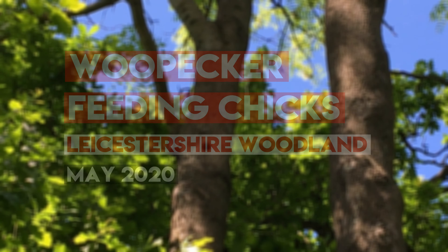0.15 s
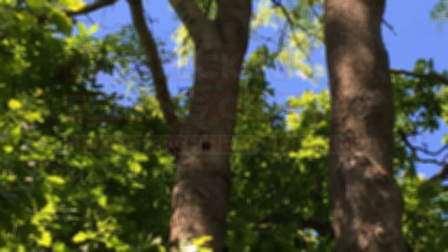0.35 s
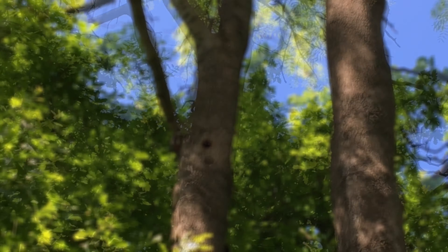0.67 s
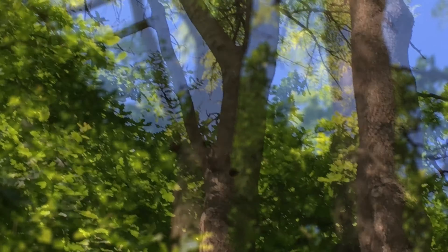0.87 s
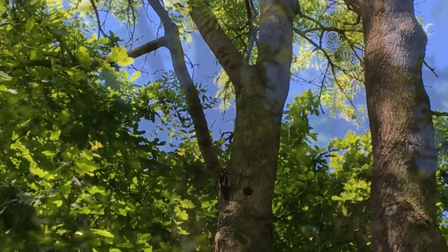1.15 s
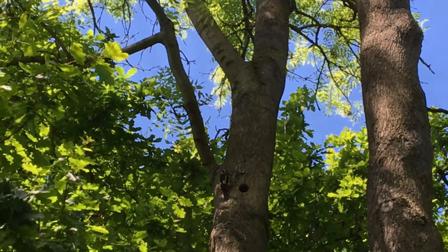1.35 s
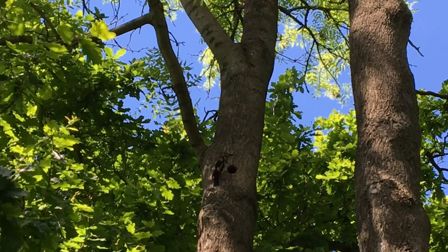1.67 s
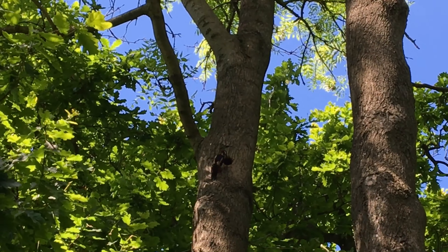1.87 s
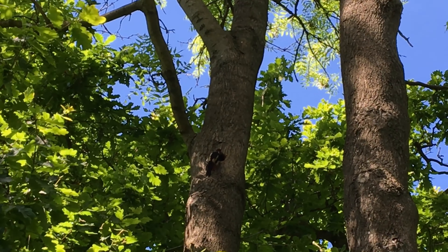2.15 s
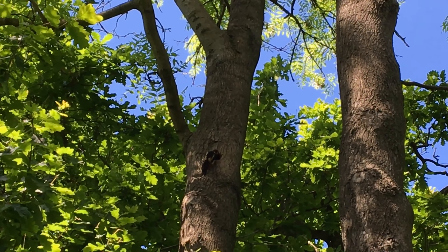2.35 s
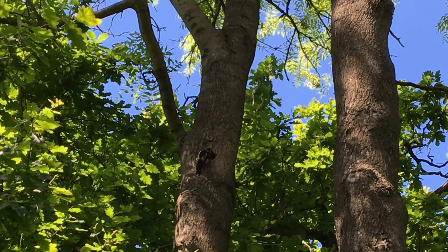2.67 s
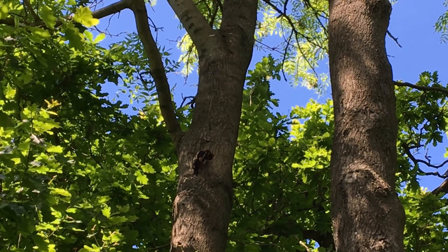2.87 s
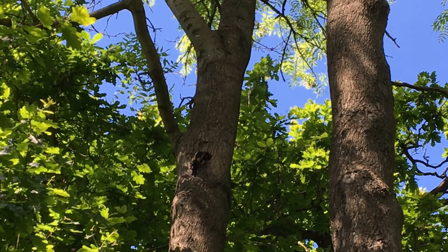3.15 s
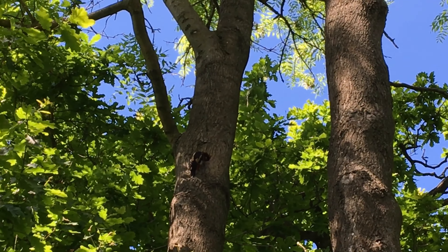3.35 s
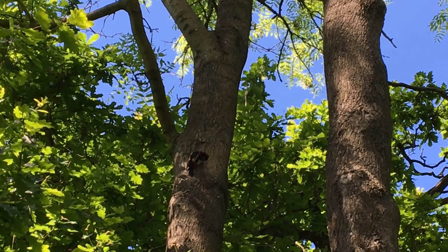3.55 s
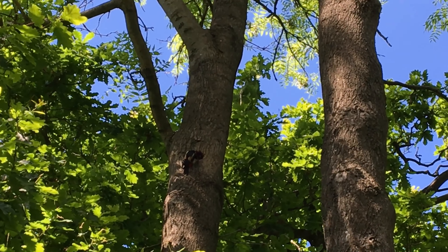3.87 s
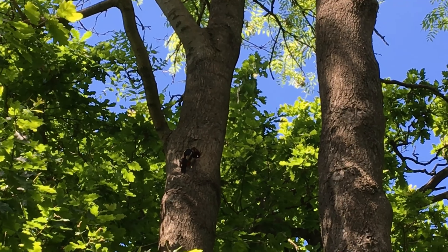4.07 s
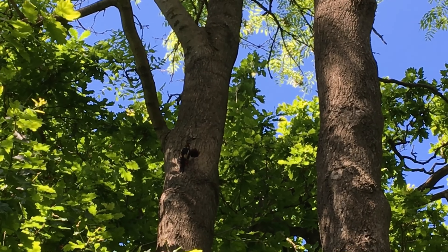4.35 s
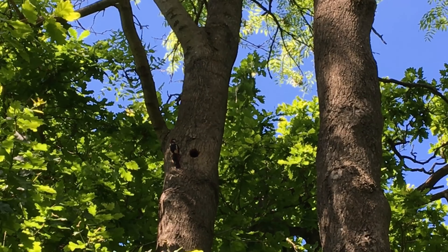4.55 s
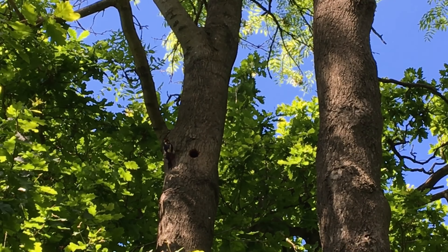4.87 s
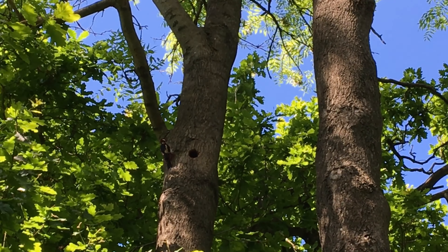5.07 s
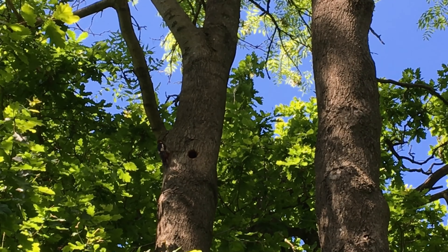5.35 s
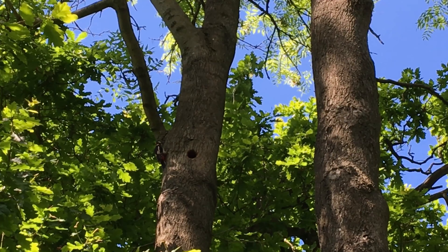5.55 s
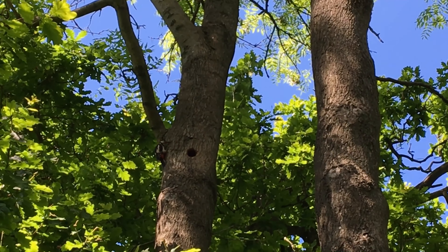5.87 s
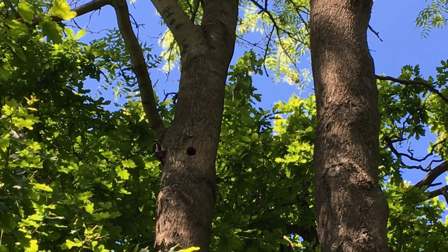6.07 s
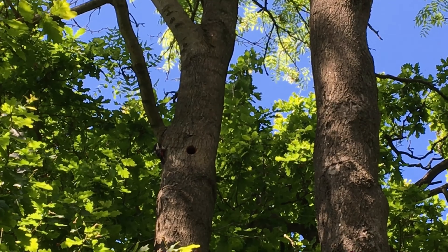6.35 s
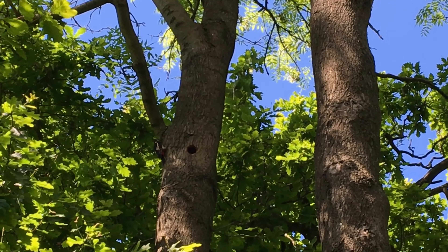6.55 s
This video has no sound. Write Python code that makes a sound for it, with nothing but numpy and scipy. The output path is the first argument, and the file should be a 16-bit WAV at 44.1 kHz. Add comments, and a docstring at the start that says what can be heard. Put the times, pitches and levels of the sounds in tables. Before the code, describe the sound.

In woodland, nestlings in a tree hole beg over a low, steady road rumble. From the start come tiny arched squeaks, each about a twentieth of a second, shrill and rich in overtones, with a brief diffuse echo from trunks and leaves. A very faint high trill of a far bird passes within the first 0.6 seconds. The calls strengthen after 1.2 and run regularly, about five a second, until 3.4, sometimes hoarse. Small dry ticks fall near 1.5 and 2.0. A heavy vehicle accelerates behind, its low hum rising from about 1.2 to 5.4, strongest around 3.9, while traffic roar and brighter hiss swell towards 4 to 5. Front squeaks weaken at 3.5 to 3.9; lower, lopsided yelps come around 4.1, 4.3, 5.1 and 5.3 among faint deep peeps. From 5.6 the clear squeaks resume steadily to the end as the traffic eases slightly.

```python
"""Woodpecker nestlings beg from a tree hole: short arched squeaks with many partials, plus a few lopsided yelps.
Each partial is a sine that follows the leaping pitch; fading noise echoes stand for trunks and leaves.
Behind the wood, coloured noise makes a road roar, and sines make a heavy vehicle accelerate on it.
A small bird trills faintly far off as a chopped whistle; there are two dry ticks and a faint hiss."""
import sys
import numpy as np
from scipy import signal
from scipy.fft import rfft, irfft
from scipy.io import wavfile
from scipy.ndimage import uniform_filter1d, map_coordinates

SR = 44100
rng = np.random.default_rng(int(sys.argv[2]) if len(sys.argv) > 2 else 0)


def generate_wav(sig):
    """Save sig (samples, or channels by samples) to the path in sys.argv[1] as 16-bit PCM at SR."""
    pcm = np.round(np.clip(np.atleast_2d(sig).T, -1, 1) * 32767).astype(np.int16)
    wavfile.write(sys.argv[1], SR, pcm)


def makeup_ratio(level_db):
    """Linear amplitude ratio for a level in decibels (20 dB per factor of ten)."""
    decades = np.asarray(level_db, float) / 20
    return 10 ** decades


N = 296352  # samples

# Chick at the mouth of the hole:
# (voice start [s], length [s], top pitch [Hz], base level [dB], muffling [dB])
FRONT_CALLS = [(-.04, 0.043, 2530, -50.5, -10.5), (.168, 0.015, 2890, -70, 17.5),
               (0.195, 0.017, 2780, -74, 22), (.347, 0.045, 2896, -61, 14), (0.563, 0.043, 2470, -53.5, 14),
               (.759, 0.039, 2570, -52, 2.5), (.96, 0.071, 2527, -53.5, 5.5),
               (.987, 0.051, 2545, -49.5, -0.3), (1.14, .051, 2570, -57, 3.5),
               (1.191, 0.042, 2744, -45.5, -3.5), (1.326, 0.049, 2584, -67.5, 9),
               (1.398, .044, 2745, -45.5, -1.5), (1.59, .043, 2960, -42.5, -9),
               (1.796, 0.048, 2795, -43, -8), (1.996, 0.044, 2814, -46.5, -6.5),
               (2.213, 0.051, 2693, -44.5, 0), (2.424, 0.05046, 2526, -43, 1), (2.629, 0.058, 2480, -44, 2),
               (2.896, .04, 2747, -44, -9), (3.092, 0.035, 2790, -41, -9.5), (3.319, .055, 2656, -44.5, 0),
               (3.553, 0.035, 5960, -78, 31.5), (3.571, 0.024, 2734, -58, 16.5),
               (3.83, 0.015, 6840, -72.5, 35), (3.843, 0.019, 3280, -57.5, 15), (3.874, .02, 2730, -61, 26),
               (4.809, .037, 2860, -58, 6), (5.575, 0.044, 2430, -47, 2.5),
               (5.76, 0.035, 2400, -46.5, -4.5), (5.956, .042, 2420, -51, 5.5),
               (6.122, 0.049, 2586, -50.5, 4), (6.311, 0.044, 2524, -49, 1), (6.498, 0.036, 2400, -48.5, 1),
               (6.682, 0.035, 2490, -49.5, 2.5)]
# Chick deep in the hole:
# (voice start [s], length [s], top pitch [Hz], base level [dB], second partial as the head turns [dB])
DEEP_CALLS = [(0.624, 0.043, 2740, -56.5, -1.5), (.812, 0.049, 2800, -51, -1.5),
              (4.378, .037, 2962, -58, -2.1), (4.456, .032, 3050, -58, -8), (4.522, 0.041, 2710, -65, 0),
              (4.662, 0.041, 2820, -62, 3), (4.864, 0.02002, 2850, -60, -9), (4.95, 0.035, 2822, -66, 2.5),
              (5.084, 0.028, 2875, -67, -6), (5.248, .028, 2850, -62, -5.5),
              (5.382, 0.037, 2730, -65.5, -1.2), (5.519, 0.053, 2750, -57, -6),
              (5.655, .038, 2570, -63.5, -19), (5.8, .036, 2575, -66, -15), (5.973, .032, 2570, -66, -9),
              (6.123, .034, 2600, -70, -8), (6.274, .036, 2600, -71, -17), (6.452, 0.023, 2382, -68, -15)]
# Lopsided yelps with a pointed crest:
# (voice start [s], rise [s], fall [s], top pitch [Hz], base level [dB])
YELP_CALLS = [(4.089, .006, .025, 2566, -46), (4.265, 0.023, 0.012, 2352, -45.5),
              (5.058, .016, .009, 1994, -48), (5.253, 0.0066, 0.019, 2270, -53.5)]
# A closing beak muffles the voice, one row for each of partials 1-5:
# (level with an even gape [dB], gain per dB of muffling [dB])
GAPE = [(0.5, 0.6169), (0, -0.04), (1, -0.51), (-7.5, -0.5), (-8.5, -0.8)]
# The front chick goes hoarse in bouts: (time [s], base breath noise [dB])
HOARSE_BOUTS = [(0, -17), (.76, -17), (1.15, -14), (1.19, -23), (2.0, -26), (2.2, -16.5), (2.65, -12.5),
                (2.88, -20.5), (3.1, -18), (3.3, -16), (3.9, -15), (5.5, -21), (6.7, -27)]
# Throat resonance that gliding partials cross: (frequency [Hz], level [dB])
THROAT = [(1500, 15), (2800, 10.5), (3800, 10.5), (5200, 6), (8000, -3.5), (13500, -10), (16000, -30.5)]
# The rim of the hole colours the front voice: (frequency [Hz], gain [dB])
RIM = [(5000, -0.7), (5900, 3), (7000, 0.1), (8500, -0.2), (9500, -0.5), (10300, -1.5), (11000, -1.5),
       (12500, 0.5), (13700, 1), (15000, -10)]
# The cavity colours the deep voice: (frequency [Hz], gain [dB])
CAVITY = [(2700, -17), (5600, 0.5), (8000, 1), (10500, -11.5), (13500, -16)]
# Colour of the yelps: (frequency [Hz], gain [dB])
YELP_COLOUR = [(2500, 1), (4600, -.1), (5200, -26), (5900, 1), (7100, -2.5), (7800, -12), (9500, 0.5),
               (10300, -18), (12500, -12)]
# Echoes of near trunks: (frequency [Hz], time to fall by 60 dB [s])
BARK = [(2000, 0.035), (8000, 0.15), (15000, 0.17)]
# Echoes of far leaves: (frequency [Hz], time to fall by 60 dB [s])
LEAVES = [(2000, 0.16), (6000, 0.6), (10000, 0.42), (15000, 0.2)]
# Road, before each noise gets its own trim; the bright hiss fades in during the first 1.5 s:
# (time [s], traffic flow level [dB], bright hiss level [dB])
TRAFFIC = [(0, -47.5, -89), (.82, -49.5, -77), (1.12, -49, -65), (1.5, -45, -60.5), (2.04, -45, -58),
           (2.5, -44.5, -59), (2.77, -45, -57), (3.12, -44.5, -56), (3.6, -44, -55), (3.99, -42.5, -54),
           (4.9, -42.5, -50.5), (5.1, -42.5, -53.5), (5.5, -44, -54.5), (5.84, -43.5, -57.5),
           (6.12, -45, -60), (6.53, -44.5, -59.5), (6.72, -46, -63)]
# Shapes of the road noises, whose loudness is set later: (frequency [Hz], relative level per Hz [dB])
RUMBLE = [(18, -45), (28, -33), (36, -18.5), (45, 6.5), (60, 9.5), (100, 0), (150, -4), (220, -13),
          (400, -20), (800, -93.5)]
DRONE = [(40, -62), (80, 7), (160, 0.5), (300, 1.5), (500, -3), (800, -4.5), (1500, -62.5)]
ROAR = [(150, -59), (400, -6), (700, -2), (1000, -1), (1400, -6.5), (1900, -12), (2600, -17), (3500, -40),
        (6000, -52)]
BRIGHT_HISS = [(600, -42), (1200, -2), (1900, 16.5), (2600, 6.5), (3500, 7), (5000, -2.5), (7000, -7),
               (9500, -32), (12000, -37), (16000, -49.5)]
# Shape of the faint hiss of leaves and microphone: (frequency [Hz], relative level per Hz [dB])
AIR = [(1000, -27), (3000, 8), (7000, -9.5), (9500, -2.5), (10500, -32), (11500, -5.5), (14000, -23),
       (16000, -23)]
# Far bird, before a trim and the chopping: (time [s], level [dB])
TRILL = [(.11, -95), (.135, -63), (.2, -80.5), (.29, -74), (.38, -65), (.48, -74), (.54, -84)]
# Accelerating engine: (time [s], firing rate [Hz], base level [dB])
ENGINE = [(1.2, 49, -41.5), (2.2, 57.6, -49), (2.4, 58.55, -37), (3.3, 66.7, -36.5), (3.6, 67.74, -35.5),
          (3.85, 70.2, -30.5), (4.1, 72.8, -35), (4.6, 77.78, -43.5), (5.0, 81.97, -37.5),
          (5.45, 85.9, -48.5)]
# Engine tones: (multiple of the firing rate [ratio], level against the base [dB])
ENGINE_ORDERS = [(1, 2), (4 / 3, -23), (5 / 3, -10), (2, -21.5), (7, -20)]
# Dry ticks, before a trim: (time [s], level [dB])
TICKS = [(1.4714, -44), (1.9911, -32)]

LEAD = SR // 10  # samples made ahead of time zero
LEAD_IN = 0.021  # s of very faint sound before each voice
# Front chick: (value with an even gape, change per dB of muffling)
CREST = (.55, -.014)  # share of the length spent rising
ARCH, LEAP = (.11, 0.00152), (.18, -.011)  # depth as a share of the top pitch
DEEP_CREST, DEEP_ARCH, DEEP_LEAP, DEEP_HOARSE_DB = 0.41, 0.092, 0.3, -29.5
YELP_ARCH, YELP_LEAP, YELP_HOARSE_DB = 0.33, 0.0285, -22
CLEAR_DB = -20  # breath noise of a clear voice
TREBLE_LOSS = 0.49  # dB lost by partials 4 and 5 per dB of breath noise above that
FLOW_DB = -45  # flow level at which rumble and drone get no swell
RUMBLE_FOLLOWS, DRONE_FOLLOWS = 0.47, 1.57  # dB per dB of flow
RUMBLE_GROWS_DB_PER_S = 0.38
TOP_HZ = 15780  # band limit


def along(points, hz):
    """Reads a value between (Hz, value) points on a log frequency axis."""
    f, v = np.transpose(points)
    return np.interp(np.log(hz + 1), np.log(f + 1), v)


def curves(rows):
    """Draws straight lines between rows: one value per sample for each column after the time."""
    s, *cols = np.transpose(rows)
    return [np.interp(np.arange(N) / SR, s, c) for c in cols]


def wobble(rate, size=N):
    """A smooth random curve through a given number of random knots a second."""
    knots = rng.standard_normal(int(size * rate / SR) + 4)
    return map_coordinates(knots, [np.arange(size) * rate / SR])


def rush(spectrum, patchy_db):
    """Coloured noise of rms 1, with patches of random gain over time and frequency."""
    hz, _, z = signal.stft(rng.standard_normal(N + 4096), SR, nperseg=4096, noverlap=3584)
    over_hz = uniform_filter1d(rng.standard_normal(z.shape), 40, 0)
    patches = uniform_filter1d(over_hz, 8, 1)
    gain = makeup_ratio(along(spectrum, hz)[:, None] + patchy_db * patches / patches.std())
    x = signal.istft(z * gain, SR, nperseg=4096, noverlap=3584)[1][:N]
    return x / x.std()


def squeak(rise, fall, top_hz, arch, leap, levels_db, hoarse_db):
    """One breath through the syrinx: the pitch leaps from a foot, ramps over the top and drops."""
    # time zero is the top of the arch
    t = np.arange(round((LEAD_IN + rise + fall + 0.0026) * SR)) / SR - LEAD_IN - rise
    rising = t < 0
    edge = np.where(rising, t / (rise + 0.001014), t / (fall + 0.00302))
    edge = np.clip(np.abs(edge), 0, 1)  # 0 at the top, 1 at either end

    # the membranes jump between slack and taut
    step = 1 / (1 + np.exp(-(edge - .84) / np.where(rising, .04, .07)))
    sag = arch * edge ** 1.628 + np.where(rising, leap, .25) * step
    pitch = top_hz * (1 - sag) * (1 + 0.0048 * wobble(419, size=len(t)))
    phase = 2 * np.pi * np.cumsum(pitch) / SR

    effort = (1 - edge ** 24) * makeup_ratio(-16 * step * (1 - step))  # the voice falters during the jump
    # a very faint, short low chirp about 21 ms before the voice
    chirp = makeup_ratio(-16) * leap * np.exp(-((t - t[0] - .004) / .003) ** 2) * 2

    # a faint rasp leads into the voice and grows towards its end
    rasp_db = np.interp(t, [-rise - .006, -rise + 0.0018, fall], [-12, -4, 2])
    fade_in = 1 - np.exp((t[0] - t) / 0.004)
    fade_out = 1 - np.exp((t - t[-1]) / 0.0021)
    rasp_gain = makeup_ratio(hoarse_db + rasp_db) * fade_in * fade_out

    # the highest partials follow the fifth
    levels_db = [*levels_db, levels_db[-1] - 10, levels_db[-1] - 8, levels_db[-1] - 15]
    voice = 0
    for k, db in enumerate(levels_db, 1):
        colour_db = along(THROAT, k * pitch) - along(THROAT, k * top_hz)  # gliding partials cross the resonance
        weak_db = np.where(rising, -3.4, -1.6) * k * edge ** 2  # high partials need full effort
        flutter_db = (1.2 + 0.3 * k) * wobble(192, size=len(t))
        strength = (effort + chirp * (k < 4)) * makeup_ratio(colour_db + weak_db + flutter_db)
        tone = strength * np.sin(k * phase + k)
        tone /= 1 + k * makeup_ratio(hoarse_db)  # hoarseness eats the high partials
        rasp_phase = .6 * phase + .4 * 2 * np.pi * top_hz * t
        rasp = rasp_gain * makeup_ratio(1.8 * k) * wobble(3000, size=len(t)) * np.sin(k * rasp_phase)
        audible = k * top_hz < .45 * SR
        voice = voice + np.sqrt(2) * makeup_ratio(db) * (tone + rasp) * audible
    return voice


def chicks():
    """All squeaks and yelps, dry; beak, hole and hoarseness set the partials, and one squeak already rings."""
    out = np.zeros(N + LEAD + SR)
    orders = np.arange(1, len(GAPE) + 1)
    calls = []
    for s, length, hz, db, muffle_db in FRONT_CALLS:
        even_db, per_db = np.transpose(GAPE)
        hoarse_db = np.interp(s, *np.transpose(HOARSE_BOUTS))
        dulled_db = TREBLE_LOSS * max(hoarse_db - CLEAR_DB, 0) * (orders > 3)
        levels_db = db + even_db + per_db * muffle_db + along(RIM, hz * orders) - dulled_db
        crest, arch, leap = [even + change * muffle_db for even, change in (CREST, ARCH, LEAP)]
        calls.append((s, length, hz, levels_db, crest, arch, leap, hoarse_db))
    for s, length, hz, db, second_db in DEEP_CALLS:
        levels_db = db + along(CAVITY, hz * orders) + second_db * (orders == 2)
        calls.append((s, length, hz, levels_db, DEEP_CREST, DEEP_ARCH, DEEP_LEAP, DEEP_HOARSE_DB))
    for s, rise, fall, hz, db in YELP_CALLS:
        length = rise + fall
        levels_db = db + along(YELP_COLOUR, hz * orders)
        calls.append((s, length, hz, levels_db, rise / length, YELP_ARCH, YELP_LEAP, YELP_HOARSE_DB))

    for s, length, hz, levels_db, crest, arch, leap, hoarse_db in calls:
        crest = np.clip(crest, .1, .9)
        rise, fall = crest * length, (1 - crest) * length
        voice = squeak(rise, fall, hz, arch, max(leap, 0), levels_db, hoarse_db)
        out[LEAD + round((s - LEAD_IN) * SR):][:len(voice)] += voice
    return out[:N + LEAD]


def scatter(x, decay, onset):
    """Diffuse echoes, each frequency dying at its own speed; the air stirs, so the tail keeps changing."""
    out, step = np.zeros(SR + len(x)), SR // 5
    for start in range(0, len(x), step):
        hz, t, z = signal.stft(rng.standard_normal(SR // 2), SR, nperseg=256)
        fading = z * makeup_ratio(-60 * t / along(decay, hz)[:, None])
        tail = signal.istft(fading, SR, nperseg=256)[1]
        tail *= 1 - np.exp(-np.arange(len(tail)) / (onset * SR))  # onset in seconds
        wet = signal.fftconvolve(x[start:start + step], tail / np.linalg.norm(tail))
        out[start:][:len(wet)] += wet
    return out[:len(x)]


def woodland(x):
    """Near trunks answer almost at once, the far canopy builds up more slowly and rings on."""
    trunks = makeup_ratio(-5.5) * scatter(x, BARK, onset=0.00064)
    canopy = makeup_ratio(-14.5) * scatter(x, LEAVES, onset=0.012)
    return trunks + canopy


def road():
    """Traffic flow drives rumble, engine drone and tyre roar; far heavy traffic builds; a bright hiss fades in."""
    flow_db, bright_db = curves(TRAFFIC)
    swell_db = flow_db - FLOW_DB
    growth_db = RUMBLE_GROWS_DB_PER_S * np.arange(N) / SR
    rumble_db = -37.5 + growth_db + RUMBLE_FOLLOWS * swell_db + 2.7 * wobble(5.9)
    drone_db = -46.5 + DRONE_FOLLOWS * swell_db + 0.86 * wobble(2.92)
    roar_db = flow_db + 1.0 + 0.86 * wobble(3.33)
    hiss_db = bright_db + 3.0 + 0.77 * wobble(2.67)
    rumble = makeup_ratio(rumble_db) * rush(RUMBLE, patchy_db=0.47)
    drone = makeup_ratio(drone_db) * rush(DRONE, patchy_db=1.5)
    roar = makeup_ratio(roar_db) * rush(ROAR, patchy_db=0.63)
    hiss = makeup_ratio(hiss_db) * rush(BRIGHT_HISS, patchy_db=1.5)
    return rumble + drone + roar + hiss


def still_air():
    """The faint steady hiss of leaves and microphone, made of coloured noise."""
    return makeup_ratio(-69.5) * rush(AIR, patchy_db=2.5)


def far_bird():
    """A thin whistle, its pitch slightly unsteady, chopped into a fast trill."""
    db, = curves(TRILL)
    t = np.arange(N) / SR
    chop = 0.44 + .35 * np.sin(2 * np.pi * 36 * t + 1.5 * wobble(20))  # about 36 pulses a second
    pitch = 6790 + 40 * wobble(80)
    whistle = np.sin(2 * np.pi * np.cumsum(pitch) / SR)
    return makeup_ratio(db + 4) * chop * whistle * (t < TRILL[-1][0])


def engine():
    """Unsteady tones at multiples of the rising firing rate, fading in and out of the rumble."""
    firing_hz, db = curves(ENGINE)
    t = np.arange(N) / SR
    present = (t > ENGINE[0][0]) * (t < ENGINE[-1][0])
    phase = 2 * np.pi * np.cumsum(firing_hz + 0.77 * wobble(8)) / SR
    tones = 0
    for k, level in ENGINE_ORDERS:
        tones = tones + makeup_ratio(db + level + 2.1 * wobble(7.7)) * np.sin(k * phase)
    return present * np.sqrt(2) * tones


def ticks():
    """Very short broad clicks: a 9 kHz wave that falls by 60 dB in 0.42 ms."""
    out, t = np.zeros(N), np.arange(64) / SR
    for s, db in TICKS:
        fading = makeup_ratio(db + 6.5 - 60 * t / 0.00042)
        out[round(s * SR):][:64] += fading * np.cos(2 * np.pi * 9000 * t)
    return out


def scene():
    """Adds the nest and its echoes in the wood to the road behind, the faint sounds around and two short ticks."""
    nest = chicks()
    nest_in_wood = (nest + woodland(nest))[LEAD:]
    mix = nest_in_wood + road() + still_air() + far_bird() + engine() + ticks()
    return mix[None]  # one channel


def roll_off(x):
    """The treble ends steeply here."""
    return signal.sosfilt(signal.butter(12, 15770, fs=SR, output="sos"), x)


def record(dry):
    """Keeps nothing above the band limit, by emptying those frequencies, and finishes the mix."""
    below_limit = np.fft.rfftfreq(N, 1 / SR) < TOP_HZ
    finished_mix = irfft(rfft(dry) * below_limit, N)
    return roll_off(finished_mix)


dry = scene()
out = record(dry)
generate_wav(out)
```